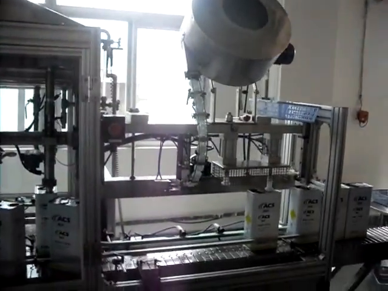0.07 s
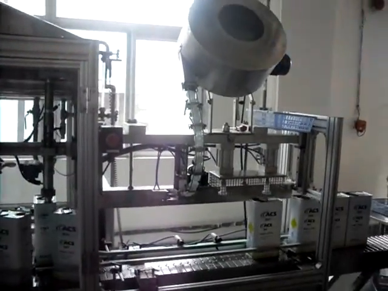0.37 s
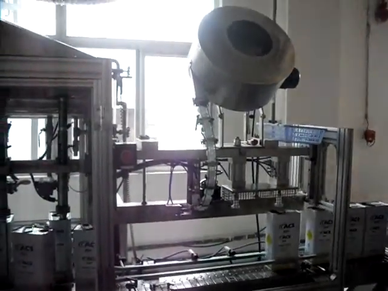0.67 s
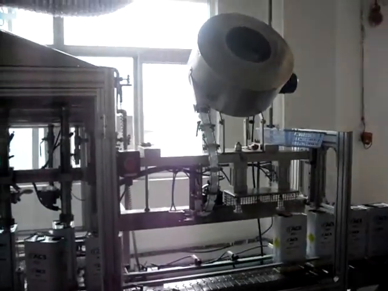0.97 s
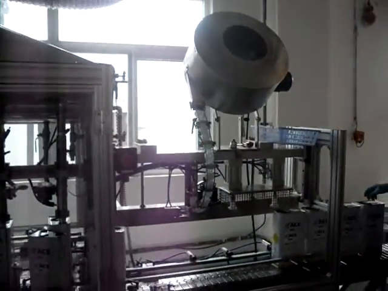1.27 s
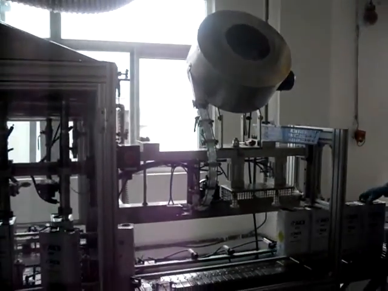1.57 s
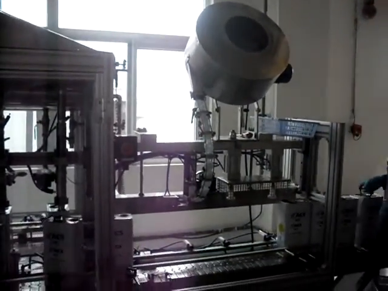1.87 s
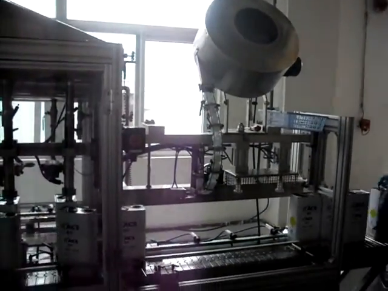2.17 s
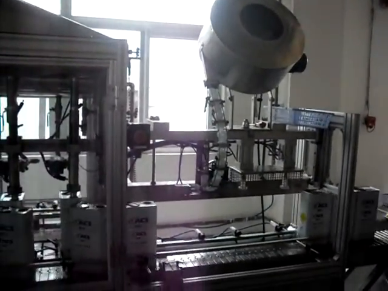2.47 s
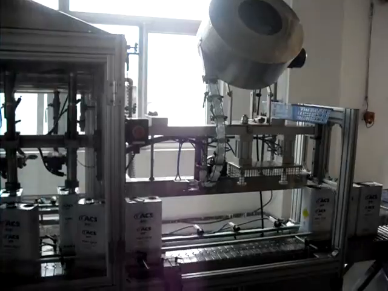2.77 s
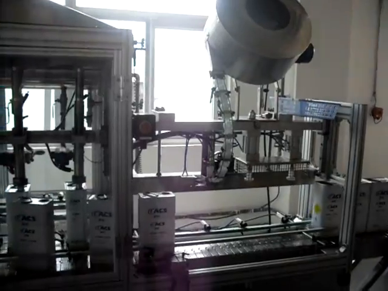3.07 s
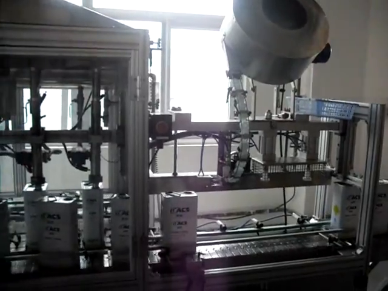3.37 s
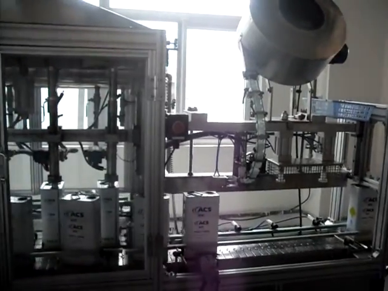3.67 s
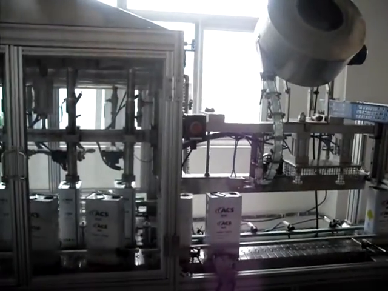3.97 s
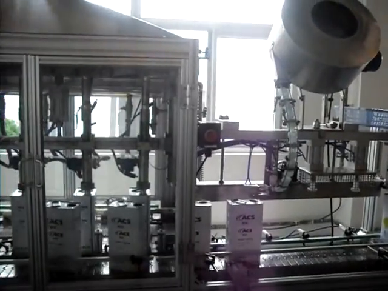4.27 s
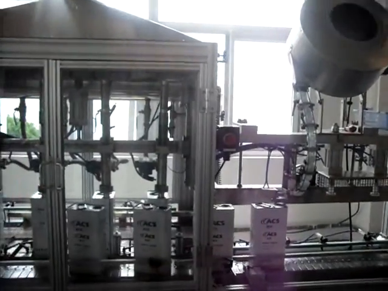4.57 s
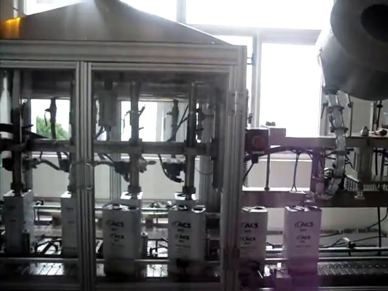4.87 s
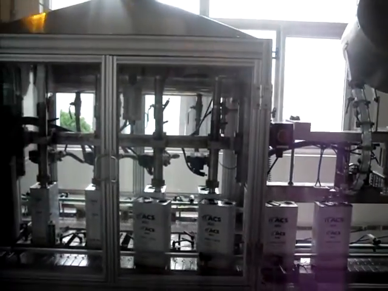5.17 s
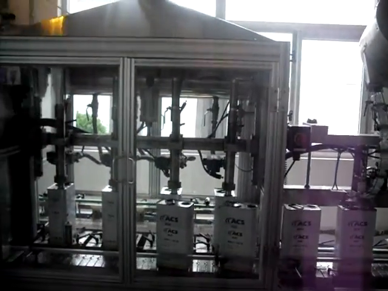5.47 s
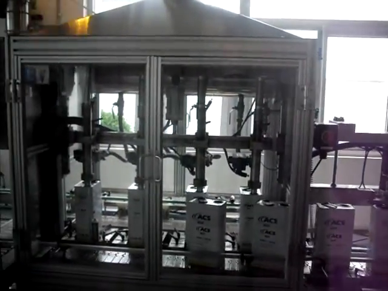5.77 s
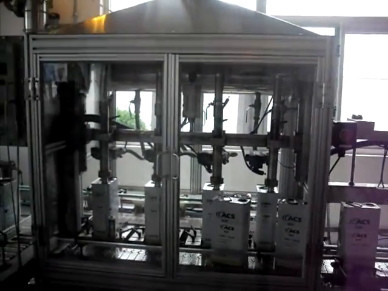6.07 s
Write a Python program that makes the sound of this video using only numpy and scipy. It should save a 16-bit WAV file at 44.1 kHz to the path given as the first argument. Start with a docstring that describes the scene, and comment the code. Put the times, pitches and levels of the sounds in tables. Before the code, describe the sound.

An automatic can filling line runs a few metres away in an echoing, hard-walled workshop. A soft, low roar of drives and fans and a slowly beating motor hum continue throughout. In the first second, air cylinders knock on the steel frame and hollow cans judder and thump on the conveyor; a guide gives a faint, short groan at about 0.9 seconds. More knocks come around 1.6 seconds, followed by light taps. A cluster of loud, rattling clunks and can thumps lands between 3.1 and 3.3 seconds. A valve hisses at 3.6 seconds, a few knocks follow, and a shorter, softer hiss comes at 4.6. At 5.2 seconds a metal stop strikes with a loud, bright, briefly ringing clink, then fainter clinks. Cans bump and the frame rattles until the end, at about 6.4 seconds. The sound is lo-fi, with little high treble.

```python
"""Can filling and capping line

An automatic line works a few metres away in a hard-walled workshop. Drives and fans lay down a soft
roar under a slowly beating motor hum. Hollow cans judder and thump along the conveyor, a guide groans
once and valves hiss through silencers. On top, a metal stop clinks and air cylinders knock and rattle
the steel frame."""
import sys
import numpy as np
from scipy import signal
from scipy.fft import rfft, irfft
from scipy.io import wavfile
from scipy.ndimage import uniform_filter1d

SR = 44100
rng = np.random.default_rng(int(sys.argv[2]) if len(sys.argv) > 2 else 0)


def dump_mix(stems):
    """Bounce the given channels to the path in sys.argv[1] as a 16-bit WAV at rate SR."""
    frames = np.atleast_2d(stems).T  # one column per channel
    limited = np.clip(frames, -1, 1)  # hard clip at full scale
    pcm = np.round(limited * 32767).astype(np.int16)
    wavfile.write(sys.argv[1], SR, pcm)


N = 278712
TIME = np.arange(N) / SR
HIT_TIME = np.arange(48000) / SR  # seconds into a one-shot

# tone of the drives and fans: f/Hz, level/dB
ROAR_EQ = [(15, -38.5), (25, -13.5), (48, -9.5), (82, -11.5), (200, -13), (330, -16), (450, -15.5),
           (750, -16.5), (1200, -22), (1700, -24.5), (2500, -25), (3300, -28), (4100, -31), (5200, -34)]
# mains hum and a motor slipping just behind it: f/Hz, relative level/dB
HUM_TONES = [(49.94, -38), (49.17, -43)]
# the conveyor shoves a group of cans together: t/s, length/s, level/dB
CAN_SHOVES = [(0, 0.15, -28.5), (0.415, 0.098, -23.5), (0.878, 0.28, -33.5), (2.052, 0.97, -37.5),
              (2.951, 0.15, -32), (3.837, 0.22, -26.5), (4.368, 0.098, -31.5), (4.799, 0.52, -44),
              (5.391, 0.097, -27), (5.639, 0.14, -29), (5.796, 0.1, -24.5), (6.032, 0.25, -27.5)]
# a can is stopped or set down: t/s, level/dB
CAN_THUMPS = [(0.034, -24), (0.52, -20), (0.744, -30), (1.69, -24), (2.074, -28), (3.115, -16),
              (3.256, -17.5), (3.912, -32.5), (3.99, -27.5), (5.415, -31.5), (5.45, -25), (5.765, -24),
              (5.851, -27), (5.97, -22.5), (6.165, -24.5)]
# boom of the thin can walls: f/Hz, level/dB
CAN_EQ = [(60, -26.5), (110, -4), (175, -3.5), (220, -4), (275, -6), (335, -2), (420, -5.5), (650, -12),
          (1200, -16.5), (3000, -46.5)]
# lowest modes of an empty can: f/Hz, width/Hz, level/dB
CAN_WALL_MODES = [(236, 24, -9.5), (289.4, 24, 8.5), (318, 41, -2), (420, 35, -13)]
# exhaust strokes: t/s, piston travel/s, level at the end of the stroke/dB
EXHAUSTS = [(3.564, 0.24, -16), (4.578, 0.091, -20.5)]
# tone of the silencer: f/Hz, level/dB
SILENCER_EQ = [(700, -34), (1400, -9.5), (1750, -6.5), (2050, -2), (2350, -1), (2800, -5), (3400, -7.5),
               (4000, -5), (5200, -9.5)]
# the silencer's cavity: f/Hz, width/Hz, level over the hiss/dB
CAVITY_MODES = [(2030, 27, 4), (2240, 73, -16), (2800, 110, -8)]
# steel on steel at the stop: t/s, level/dB, hall send/dB, ring against the clash/dB
STOP_HITS = [(5.1503, -22.5, -10, -16), (5.1977, -4.5, -6, -12), (5.2168, -13, -5, -12),
             (5.438, -23, -4, -2), (5.672, -36, -3, -6)]
# the stop's first clash: f/Hz, level/dB
CLASH_EQ = [(500, -22), (1800, -18.5), (3000, -15.5), (3700, -8.5), (4200, -4.5), (4850, -7), (5300, -8.5),
            (6000, -18.5)]
# the stop's ring, clusters of close modes: f/Hz, width/Hz, level/dB
RING_MODES = [(2336, 20, -9), (3207, 9, 1), (3250, 14, -6), (3379, 12, -6), (4117, 10, -1), (4213, 14, -3),
              (4385, 16, -10), (4655, 16, -8), (4764, 18, -2), (4863, 18, 5), (4915, 14, -2),
              (4985, 22, -6)]
# blows on the frame: t/s, level/dB, tilt/(dB per octave), chatter/s, hall send/dB, hardness from 0 to 1
FRAME_HITS = [ (0.034, -12, 0, 0.0056, -0.5, 1), (0.326, -22.5, -3, 0.055, 2, 0.95),
              (0.426, -18.5, 1.5, 0.024, 3, 1), (0.497, -17, -0.5, 0.055, 3.5, 0.85),
              (0.518, -21, -2.5, 0.14, 1, 0.2), (0.673, -21.5, -0.6, 0.033, 2.5, 0.1),
              (0.776, -22, 1.5, 0.0054, 6, 0.7), (1.534, -20.5, -1, 0.023, -1, 0.93),
              (1.573, -22, -2.5, 0.017, 1.5, 0.5), (1.677, -16, 1.9, 0.025, -2, 0.8),
              (1.72, -26.5, -2, 0.034, -7, 0.3), (2.005, -27, 5, 0.016, -3.5, 0.1),
              (2.394, -30.5, 1, 0.012, -8, 0.6), (2.662, -26, 4, 0.038, -1.5, 0.9),
              (2.74, -26, 1, 0.007, 1, 0.6), (2.884, -26.5, 11, 0.008, -8, 0.7),
              (2.958, -28.5, 10, 0.018, -7, 0.4), (3.05, -19.5, 2.5, 0.039, 3.5, 0.2),
              (3.086, -10.5, -1.96, 0.023, 5, 0.8), (3.110, -8.5, -2.5, 0.021, 1, 0.04),
              (3.229, -6, 3, 0.047, 2.5, 1), (3.252, -12.5, -0.5, 0.06, 2, 0.3),
              (4.096, -21.5, 0, 0.055, 5, 0.6), (4.151, -23.5, -2.2, 0.09, 1.5, 0.35),
              (4.25, -20, -2, 0.019, 3.5, 0.3), (4.399, -26.5, -2.5, 0.028, -1.5, 0.4),
              (5.155, -24, 7.5, 0.075, -3, 0.9), (5.202, -14, 2.5, 0.048, 2.5, 0.54),
              (5.376, -19.5, 1.4, 0.058, 1.5, 0.4), (5.737, -24.5, -2, 0.02, 3.5, 0.3),
              (5.825, -25, -1.5, 0.034, 3, 0.2), (5.985, -25, -0.5, 0.046, 2, 0.15),
              (6.127, -18, 3.5, 0.037, -9, 0.3), (6.149, -22, -0.6, 0.16, -3, 0.85)]
# body of the steel frame: f/Hz, level/dB
FRAME_EQ = [(50, -30), (90, -22), (140, -10), (200, -6.5), (290, -9), (400, -4.5), (520, -8.5), (800, -5.5),
            (1100, -5.5), (1450, -8.5), (2150, -10.5), (3100, -13.5), (4200, -15.5), (5000, -16.5)]
# the frame's panels: f/Hz, width/Hz, level over the dense modes/dB
PANEL_MODES = [(278, 17, 7), (326.7, 7.3, 6), (643, 39, -0.5), (685, 19, -3), (839, 27, -1),
               (1054, 6.1, -1.5), (1273, 4.1, 6), (1504, 9, -1), (1770, 24, 1), (1930, 15, -2),
               (2157, 37, 0), (2336, 24, -1.5), (2517, 22, -0.5), (2900, 8.9, -1)]
# treble cut on the whole mix: f/Hz, level/dB
MASTER_EQ = [(0, 0), (5000, 0), (5250, -4), (5500, -13), (5850, -16), (6050, -23), (6230, -40),
             (6400, -80), (SR / 2, -120)]


def undb(db):
    """Decibels to gain."""
    return 10 ** (np.asarray(db) / 20)


def rms(x):
    """Average signal strength."""
    return np.sqrt(np.mean(x ** 2))


def loudest(x, db):
    """Set the level of the loudest 16 ms."""
    return x * undb(db) / np.sqrt(uniform_filter1d(x ** 2, size=700).max())


def add(track, s, sound):
    """Mix a sound in from time s."""
    start = int(s * SR)
    track[start:start + len(sound)] += sound[:N - start]


def colour(x, points, tilt_db=0):
    """Causal EQ from (f/Hz, level/dB) points, with a tilt per octave from 200 Hz to 6 kHz."""
    size = 4096
    hz, db = np.transpose(points)
    octave = np.log2(np.maximum(np.arange(size // 2 + 1) * SR / size, 1))
    tilt = tilt_db * np.clip(octave, np.log2(200), np.log2(6000))
    curve_db = np.interp(octave, np.log2(hz), db) + tilt
    cepstrum = irfft(np.log(undb(curve_db - curve_db.max())))
    cepstrum[1:size // 2] *= 2  # fold to minimum phase: nothing rings ahead of a hit
    cepstrum[size // 2 + 1:] = 0
    impulse = irfft(np.exp(rfft(cepstrum)))
    return signal.fftconvolve(x, impulse)[:len(x)]


def resonate(x, modes):
    """Parallel band-passes, one for each mode."""
    return sum(undb(db) * signal.lfilter(*signal.iirpeak(hz, hz / width, fs=SR), x)
               for hz, width, db in modes)


def fade(t60):
    """One-shot decay, 60 dB down after t60 seconds."""
    return np.exp(-np.log(1000) * HIT_TIME / t60)


def stroke(s, length, attack_s, release_db_per_s, start_db=0):
    """Envelope that opens at time s, swells from start_db to full over its length, then dies away."""
    age = TIME - s
    swell_db = start_db * np.clip(1 - age / length, 0, 1)
    release_db = release_db_per_s * np.maximum(age - length, 0)
    return np.clip(age / attack_s, 0, 1) * undb(swell_db - release_db)


def wander(rate_hz):
    """Smooth random drift, spread near 1."""
    steps = rng.standard_normal(2048)
    drift = np.interp(TIME * rate_hz, np.arange(len(steps)), steps)
    return uniform_filter1d(drift, int(SR / rate_hz) // 2) * np.sqrt(2)


def contacts(count, per_s, scatter_db):
    """Tiny impacts at random moments, of uneven size."""
    hits = rng.random(count) < per_s / SR
    return hits * rng.choice([-1, 1], count) * undb(scatter_db * rng.standard_normal(count))


def diffuse(x, t60):
    """Countless reflections: noise whose power follows the sound's and dies away."""
    keep = np.exp(-2 * np.log(1000) / (t60 * SR))
    power = signal.lfilter([1 - keep], [1, -keep], x ** 2)
    return rng.standard_normal(len(x)) * np.sqrt(power)


def workshop(x, hall_db, early_db, early_t60):
    """Direct sound, early reflections inside the machine, then the hall, whose treble dies first."""
    crossover_hz = 1500
    early = diffuse(x, early_t60)
    bass = signal.lfilter(*signal.butter(1, crossover_hz, fs=SR), diffuse(early, t60=1.61))
    treble = signal.lfilter(*signal.butter(1, crossover_hz, "high", fs=SR), diffuse(early, t60=0.97))
    early_gain, hall_gain = undb(early_db), undb(early_db + hall_db)
    mix = x + early_gain * early + hall_gain * (bass + treble)
    return mix / np.sqrt(1 + early_gain ** 2 + hall_gain ** 2)


def drives_and_fans():
    """The bed: a soft, low roar whose level wavers a little."""
    roar = colour(rng.standard_normal(N), ROAR_EQ)
    return roar / rms(roar) * undb(-32.4 + 0.89 * wander(rate_hz=4.1))


def motor_hum():
    """A motor slips just behind the mains hum, so the two beat slowly."""
    in_step_s = 0.93
    hum = sum(undb(db) * np.sin(2 * np.pi * hz * (TIME - in_step_s)) for hz, db in HUM_TONES)
    return hum * undb(-0.5 + 1.6 * wander(rate_hz=11))


def guide_groan():
    """A sliding guide sticks and slips unevenly: a short, rough tone that sags in mid-travel."""
    start_s, length_s = 0.83, 0.25
    travel = np.clip((TIME - start_s) / length_s, 0, 1)
    slip_hz = 470 - 54.5 * np.sin(np.pi * travel)
    phase = 2 * np.pi * np.cumsum(slip_hz) / SR
    rough = wander(150) * np.sin(phase) + wander(170) * np.cos(phase)  # smeared as by many reflections
    return rough * undb(-31) * stroke(start_s, length_s, attack_s=0.036, release_db_per_s=169)


def can_judder():
    """Cans bump each other and the rails, harder at each shove; their walls boom, the frame joins in."""
    tremble = undb(-37)  # cans riding the moving chain
    shoves = sum(undb(db) * stroke(s, length, attack_s=0.05, release_db_per_s=92)
                 for s, length, db in CAN_SHOVES)
    push = np.hypot(tremble, shoves)
    bumps = push * contacts(N, per_s=300, scatter_db=2.7)
    wet = workshop(bumps, hall_db=-6, early_db=2.5, early_t60=0.15)
    boom = colour(wet + undb(-12) * resonate(wet, PANEL_MODES), CAN_EQ)
    return boom / rms(boom) * rms(push)


def can_thumps():
    """A blunt push on an empty can: only the lowest modes of its walls answer."""
    track = np.zeros(N)
    for s, db in CAN_THUMPS:
        push = rng.standard_normal(len(HIT_TIME)) * fade(t60=0.15)
        wet = workshop(push, hall_db=-5.5, early_db=-4, early_t60=0.29)
        thump = colour(resonate(wet, CAN_WALL_MODES), CAN_EQ)
        add(track, s, loudest(thump, db))
    return track


def valve_hiss():
    """Spent air rushes through a silencer, swelling as the piston travels; then the cylinder empties."""
    flow = sum(undb(db) * stroke(s, travel, attack_s=0.017, release_db_per_s=63.5, start_db=-4)
               for s, travel, db in EXHAUSTS)
    flow *= undb(0.93 * wander(rate_hz=36))  # flutter
    air = workshop(flow * rng.standard_normal(N), hall_db=-2.4, early_db=6.5, early_t60=0.17)
    hiss = colour(air + resonate(air, CAVITY_MODES), SILENCER_EQ)
    return hiss / rms(hiss) * rms(flow)


def stop_clinks():
    """Steel on steel: a short, bright clash, then the stop rings on in clusters of modes that beat."""
    track = np.zeros(N)
    for s, db, hall_db, ring_db in STOP_HITS:
        strike, shimmer = rng.standard_normal((2, len(HIT_TIME)))
        wet = workshop(strike * fade(t60=0.024), hall_db, early_db=-1.5, early_t60=0.17)
        clash = colour(wet, CLASH_EQ)
        ring = resonate(shimmer, RING_MODES) * fade(t60=0.52)
        add(track, s, loudest(clash, db) + loudest(ring, db + ring_db))
    return track


def cylinder_knocks():
    """A cylinder hits its end stop; loose parts chatter briefly and the frame's panels ring."""
    track = np.zeros(N)
    for s, db, tilt_db, chatter_s, hall_db, hardness in FRAME_HITS:
        # a cushioned stroke builds up, a hard one is there at once
        attack = 1 - (1 - hardness) * np.exp(-HIT_TIME / (0.31 * chatter_s))
        decay = np.exp(-(HIT_TIME / chatter_s) ** 2)
        chatter = contacts(len(HIT_TIME), per_s=4000, scatter_db=1.9) * attack * decay
        wet = workshop(chatter, hall_db, early_db=2, early_t60=0.25)
        knock = colour(wet + resonate(wet, PANEL_MODES), FRAME_EQ, tilt_db)
        add(track, s, loudest(knock, db))
    return track


def scene():
    """The whole line in mono: the moving parts over the bed of roar and hum."""
    action = cylinder_knocks() + stop_clinks() + valve_hiss() + can_judder() + can_thumps()
    return (action + guide_groan() + drives_and_fans() + motor_hum())[None]


def record(dry):
    """Lo-fi master: little passes above 5 kHz, and a soft clip squashes the loudest peaks."""
    ceiling, knee, top_hz = 0.75, 10, 16000
    hz, db = np.transpose(MASTER_EQ)
    gain = undb(np.interp(np.arange(N + 1) * SR / (2 * N), hz, db))
    narrow = irfft(rfft(dry, 2 * N) * gain)[:, :N]
    squashed = narrow / (1 + (np.abs(narrow) / ceiling) ** knee) ** (1 / knee)
    return signal.sosfilt(signal.ellip(8, .2, 70, top_hz, fs=SR, output="sos"), squashed)


dry = scene()
out = record(dry)
dump_mix(out)
```